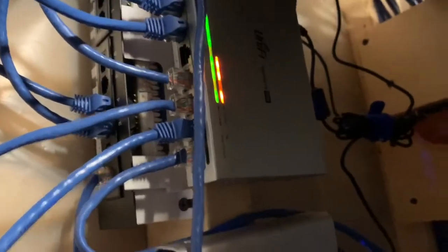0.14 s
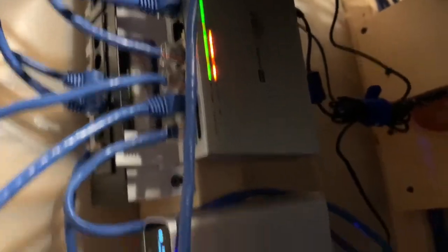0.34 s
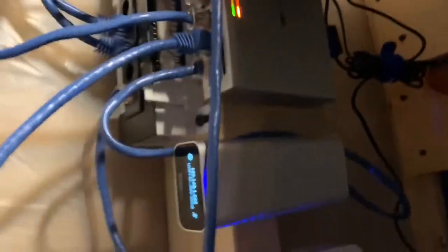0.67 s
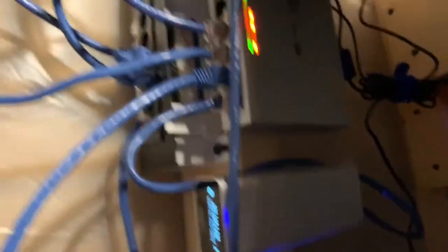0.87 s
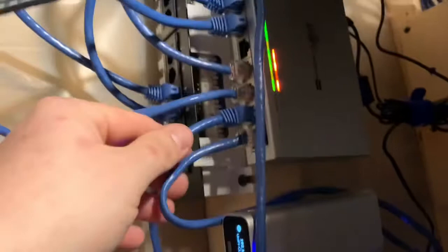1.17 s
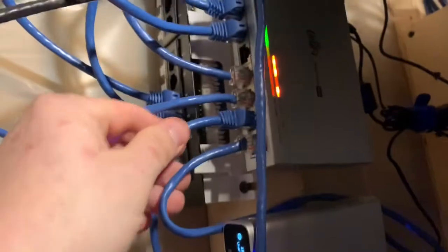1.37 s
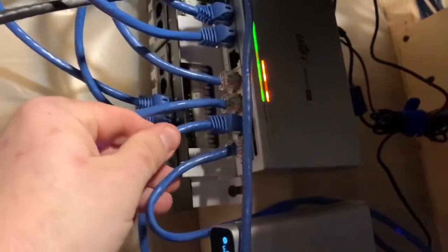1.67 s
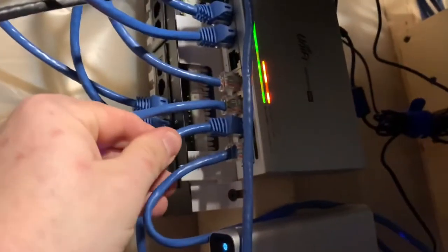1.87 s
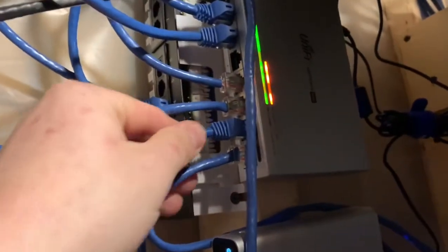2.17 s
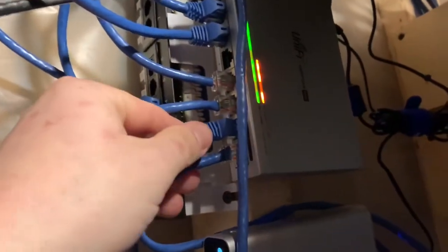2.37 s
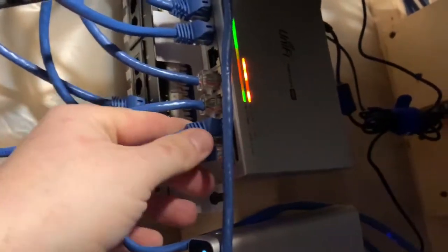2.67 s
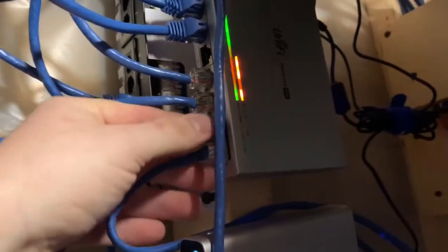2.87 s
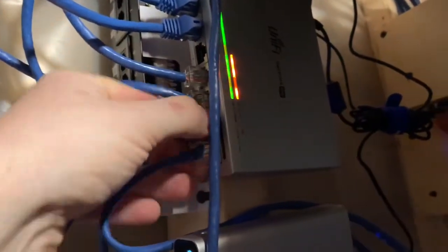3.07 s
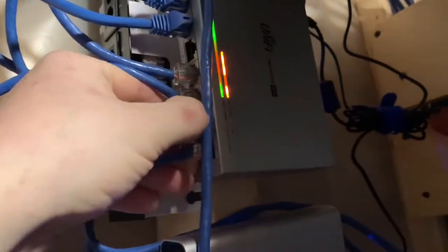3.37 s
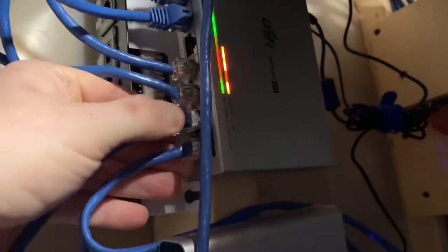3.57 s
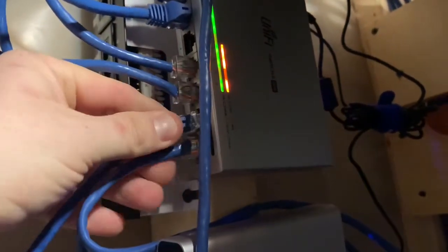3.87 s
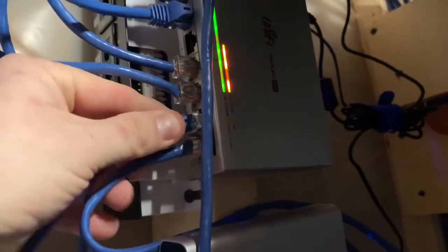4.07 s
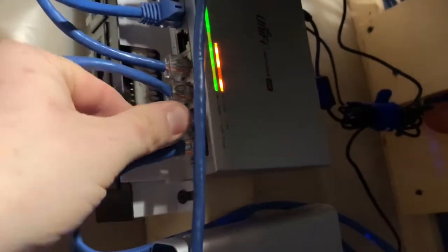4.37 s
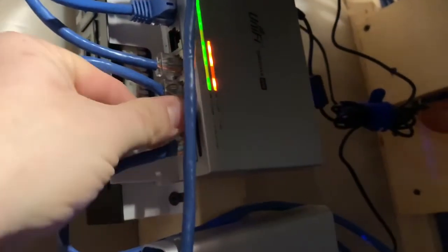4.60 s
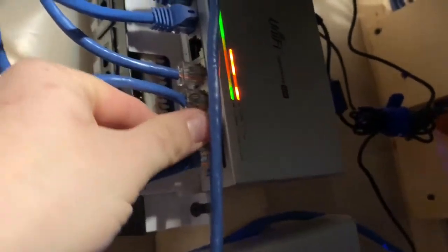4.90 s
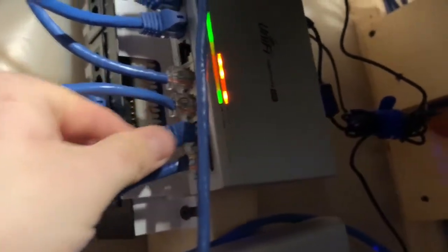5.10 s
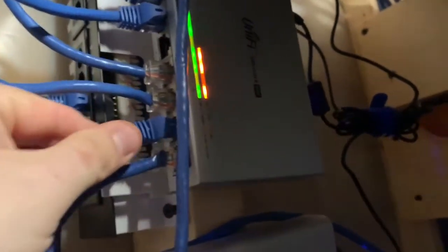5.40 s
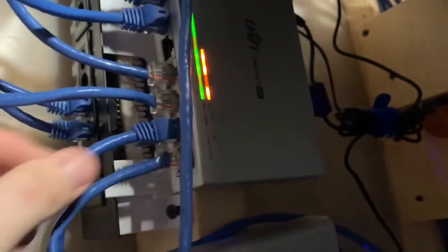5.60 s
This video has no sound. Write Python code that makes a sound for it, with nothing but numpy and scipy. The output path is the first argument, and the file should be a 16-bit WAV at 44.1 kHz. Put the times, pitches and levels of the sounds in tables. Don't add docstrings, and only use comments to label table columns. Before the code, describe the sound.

Quiet room with soft steady hiss and low, uneven rumble from a hand-held microphone, close to the plugs. At about 0.3 s there are faint plastic ticks; a light brush and dull bump follow around 0.8 s, then a scuff at 0.9 and a low thud at 1.1. At 1.3 s a plug is driven in with a loud, hollow, boxy knock and tiny rebound, followed at 1.5 by a heavy desk thud with cable rub and smaller bumps until 1.9. The middle is sparse: a grainy scrape with a thin squeak near 2.5, soft scuffs to 3.1, dull taps and finger rustle at 3.3-3.9. At 4.4 s a bump precedes a very sharp, bright latch snap at 4.47 with a low thump beneath. Faint ticks lead to a second hard hollow knock at 5.1, then small bumps, rubbing and a last rustle near 5.7. The room tail is short and faint.

```python
import sys
import numpy as np
from scipy import signal
from scipy.io import wavfile

SR = 44100
rng = np.random.default_rng(int(sys.argv[2]) if len(sys.argv) > 2 else 0)


def gain_from_db(level_db):
    decades = np.asarray(level_db, float) / 20
    return 10 ** decades


def master(y):
    cut = np.clip(np.atleast_2d(y).T, -1, 1)
    pcm = np.round(cut * 32767)
    wavfile.write(sys.argv[1], SR, pcm.astype(np.int16))


N = 253442
RING = int(.45 * SR)
BLOW_LAG_S = -.000165
HISS_TOP_HZ = 15400

# pitch in Hz, level in dB, t60 in seconds.
CASING = [(246, -8, 0.12), (357.4, 0, 0.29), (531, -8.5, 0.12), (600, 4.5, 0.06), (740, -7, 0.12),
          (955, -11, 0.16)]
# pitch in Hz, level in dB, t60 in seconds.
SHELL = [(950, -10.5, 0.11), (1130.5, 0, 0.054), (1313, -5.5, 0.13), (1590, -2.5, 0.038),
         (1800, -2.5, 0.036), (1961, 1, 0.073), (2320, 1, 0.041), (2810, 0, 0.051), (3250, -5.5, 0.019),
         (3730, -13, 0.017)]
# pitch in Hz, level in dB, t60 in seconds.
PLUG = [(3920, -2.5, 0.028), (4366, -1, 0.038), (5343, -10.5, 0.004), (6280, -7.5, 0.024),
        (7200, -11.5, 0.0029), (8463, -4.5, 0.045), (8940, -3, 0.017), (10290, -4.5, 0.022),
        (12900, -11, 0.0025), (14700, -9, 0.015), (14300, -11, 0.012)]


def bandpass(x, order, low_hz, high_hz):
    return signal.sosfilt(signal.butter(order, [low_hz, high_hz], "band", fs=SR, output="sos"), x)


def steep_low(x, order, stop_db, hz):
    return signal.sosfilt(signal.cheby2(order, stop_db, hz, fs=SR, output="sos"), x)


def in_time(rows):
    s, *columns = np.transpose(rows)
    return [np.interp(np.arange(N) / SR, s, c) for c in columns]


def at_hz(points, hz):
    return np.interp(np.log(hz), np.log(np.array(points)[:, 0]), np.array(points)[:, 1])


def rms_one(x):
    return x / np.sqrt(np.mean(x ** 2) + 1e-20)


def add(out, s, sound):
    i = round(s * SR)
    out[:, i:i + sound.shape[1]] += sound[:, :N - i]


def drift(rate_hz, spread_db):
    r = np.exp(-80 * np.pi * rate_hz / SR)
    slow = signal.lfilter([1], [1, -2 * r, r * r], rng.standard_normal(N // 40 + 2002))[2000:]
    gain = gain_from_db(spread_db * rms_one(slow - slow.mean()))
    return np.interp(np.arange(N) / 40, np.arange(len(slow)), gain)


def banded(source, spectrum, patchy_db):
    # frequency in Hz, share heard by both ports (0-1).
    likeness = [(60, 0.93), (180, 0.8), (550, 0.55), (1650, 0.12), (4000, 0.28), (7000, 0.45),
                (10000, 0.36), (15000, 1)]
    left_lag_s = -.000214
    shared, own = source[0], np.array([source[1], source[1][::-1]])
    shared = np.array([np.roll(shared, round(left_lag_s * SR)), shared])
    ends = np.log2(np.array(spectrum)[[0, -1], 0])
    edges = 2 ** np.arange(ends[0], ends[1] + .25, .5)
    out = 0
    for low, high in zip(edges, np.minimum(edges[1:], .45 * SR)):
        hz = np.sqrt(low * high)
        level_db = at_hz(spectrum, hz)
        if level_db < -55:
            continue
        alike = np.clip(at_hz(likeness, hz), 0, 1)
        both = np.sqrt(alike) * shared + np.sqrt(1 - alike) * own
        out = out + gain_from_db(level_db) * drift(12, patchy_db) * bandpass(both, 2, low, high)
    return rms_one(out)


def body(modes, lag_s=BLOW_LAG_S):
    hz, level_db, t60 = np.transpose(modes)[:, :, None]
    t = np.arange(min(RING, round(1.3 * t60.max() * SR))) / SR
    swell = 1 - np.exp(-3 * hz * t)
    ringing = swell * gain_from_db(level_db - 60 * t / t60) * np.exp(2j * np.pi * hz * t)
    return ringing, np.exp(-2j * np.pi * hz[:, 0] * [[lag_s], [0]])


def crowd(modes, spread, count):
    rows = np.repeat(np.array(modes, float), count, axis=0)
    rows[:, 0] *= 1 + spread * rng.uniform(-1, 1, len(rows))
    rows[:, 2] *= 0.93
    return rows


def ports(rings, hz):
    # frequency in Hz, left lead in radians.
    lead = [(130, -0.15), (330, 0), (400, -1), (470, 3), (530, 0), (588, -1.42), (777, 1), (982, 0.65),
            (1180, -1), (1360, -2)]
    # frequency in Hz, left minus right in dB.
    pan = [(130, -4), (165, -2.5), (270, 4.5), (330, -0.5), (470, 6.5), (588, 4.5), (777, 1.5), (982, -3),
           (1600, -3)]
    halves = np.array([[.5], [-.5]])
    return rings[0], gain_from_db(at_hz(pan, hz) * halves) * np.exp(1j * at_hz(lead, hz) * halves)


def strike(rings, contact, peak_db, scatter_db, apart):
    ringing, lag = rings
    draw = rng.standard_normal((3, len(ringing)))
    phase = apart * draw[1] * [[.7], [-.7]] + .3 * draw[2]
    weights = gain_from_db(scatter_db * draw[0]) * lag * np.exp(1j * phase)
    sound = signal.fftconvolve((weights @ ringing).imag, contact[None])[:, :RING]
    return gain_from_db(peak_db) * sound / np.abs(sound).max()


def chatter(length_ms, grain_db):
    t = np.arange(RING // 4) * 1000 / SR / max(length_ms, .1)
    slips = rng.standard_normal(len(t)) * gain_from_db(grain_db * rng.standard_normal(len(t)))
    return slips * (1 - np.exp(-t / .12)) * (np.exp(-t / .45) + .3 * np.exp(-t / 1.6))


def soft(length_ms):
    return np.hanning(max(round(length_ms * SR / 1000), 3))


def burst(length_ms, peak_db, low_hz, high_hz):
    crack = bandpass(np.pad(chatter(length_ms, 2.0), (20, 200)), 3, low_hz, high_hz)
    both = np.array([np.roll(crack, round(BLOW_LAG_S * SR)), crack])
    return gain_from_db(peak_db) * both / np.abs(crack).max()


def grains(per_s):
    born = rng.random((2, N)) < per_s / SR
    sizes = gain_from_db(2.5 * np.minimum(rng.exponential(1, (2, N)), 4)) * rng.standard_normal((2, N))
    return rms_one(born * sizes) + .8 * rng.standard_normal((2, N))


def strokes(rows):
    edge_s = 0.25
    t = np.arange(N) / SR
    gain = np.zeros(N)
    for s, length_s, db in rows:
        gain += gain_from_db(db) * np.clip(np.minimum(t - s, s + length_s - t) / edge_s + .5, 0, 1) ** 2
    return gain


def steady_hiss():
    # frequency in Hz, density in dB per Hz.
    spectrum = [(59, -30), (100, -11.5), (167, -24.5), (359, -15), (772, -21.5), (1290, -23.5), (2500, -28),
                (5000, -32), (7200, -32.5), (9300, -30.5), (11500, -33.5), (14300, -36), (16200, -55)]
    hiss = gain_from_db(-76.5) * banded(rng.standard_normal((2, N)), spectrum, patchy_db=2.04)
    return steep_low(hiss, 10, 30, HISS_TOP_HZ)


def grip_rumble():
    # time in seconds, level in dB.
    grip = [(0.0, -59), (0.57, -75), (0.78, -60), (0.93, -54.5), (1.3, -64.5), (1.52, -53), (2.25, -68),
            (2.42, -59), (3.07, -57), (3.4, -54.5), (4.21, -61.5), (4.54, -49), (4.8, -55.5), (5.15, -55),
            (5.28, -60), (5.42, -55.5), (5.75, -72)]
    # frequency in Hz, density in dB per Hz.
    spectrum = [(12, -56.5), (20, -14.5), (42, -6.5), (59, 5.5), (72, 0.5), (92, -13), (216, -23),
                (250, -20.5), (320, -61), (550, -120)]
    grip_db, = in_time(grip)
    return gain_from_db(grip_db + 4.5) * banded(rng.standard_normal((2, N)), spectrum, patchy_db=4.5)


def cable_rub():
    # time in seconds, effort in dB.
    effort = [(0.0, -72.5), (0.77, -79.5), (0.94, -66), (1.14, -57.5), (1.33, -66), (1.49, -51),
              (1.77, -68.5), (2.02, -80.5), (2.22, -73.5), (2.83, -62.5), (3.38, -67), (3.49, -71.5),
              (4.34, -73), (4.48, -75), (5.01, -65), (5.28, -61), (5.54, -63.5), (5.75, -71.5)]
    # frequency in Hz, density in dB per Hz.
    spectrum = [(88, -29), (150, -3.5), (221, -3), (255, -7), (438, -10.5), (646, -17.5), (1780, -31),
                (2500, -46.5), (3250, -66), (5500, -120)]
    mean_effort_db, rub_db, follows = -65.5, -67.5, 1.4
    effort_db, = in_time(effort)
    gain = gain_from_db(rub_db + follows * (effort_db - mean_effort_db))
    return gain * banded(grains(880), spectrum, patchy_db=4.5)


def rustle():
    # frequency in Hz, density in dB per Hz.
    spectrum = [(900, -31), (1500, -3.5), (2000, -3.5), (3500, -6.5), (6000, -10.5), (10000, -14.5),
                (14000, -21), (16000, -27)]
    # start in seconds, length in seconds, level in dB.
    fingers = [
        (0.55, 0.13, -94),
        (0.855, 0.33, -72),
        (2.089, 0.29, -88),
        (2.65, 0.42, -71.5),
        (3.39, 0.079, -63.5),
        (3.838, 0.53, -79),
        (4.407, 0.22, -65.5),
        (5.18, 0.21, -81.5),
        (5.675, 0.24, -70.5),
    ]
    # start in seconds, length in seconds, level in dB.
    sleeve = [
        (0.45, 0.75, -73),
        (2.8, 0.12, -72.5),
        (5.68, 0.13, -86),
    ]
    # start in seconds, length in seconds, level in dB.
    dull_strokes = [
        (1.24, 0.24, -71.5),
        (1.493, 0.095, -55.5),
    ]
    noise = banded(grains(4000), spectrum, patchy_db=1.5)
    bright = bandpass(noise, 1, 4500, 12000)
    dull = signal.sosfilt(signal.butter(3, 4900, fs=SR, output="sos"), noise)
    mix = strokes(fingers) * noise + strokes(sleeve) * bright + strokes(dull_strokes) * dull
    return steep_low(mix, 10, 30, HISS_TOP_HZ)


def drags():
    # start in seconds, length in seconds, level in dB, pitch in Hz, width in Hz.
    drag_rows = [(5.6, .17, -78.5, 540, 160), (5.73, .3, -70, 330, 220), (1.4, 0.055, -77, 1300, 40),
                 (1.75, 0.063, -60, 613, 83), (3.85, 0.497, -83, 1240, 120), (2.121, .084, -78, 1555, 70),
                 (2.224, .062, -80, 1625, 110), (.022, .121, -81, 1612, 50), (.031, .078, -82, 1838, 50),
                 (1.635, .075, -75, 1800, 40), (4.28, 0.048, -68, 690, 250), (3.86, .05, -65, 430, 93),
                 (2.84, 0.22, -81, 1860, 300), (5.39, 0.18, -69, 556, 250), (.92, .045, -66, 620, 90),
                 (.92, .045, -70, 1130, 80), (5.17, .07, -48, 110, 70), (2.88, .12, -60, 200, 110)]
    edge_s = 0.032
    out = np.zeros((2, N))
    t = np.arange(round(.7 * SR)) / SR - .1
    skip = round(.08 * SR)
    for s, length_s, db, hz, width_hz in drag_rows:
        white = rng.standard_normal((3, len(t)))
        noise = bandpass(white[0] + .6 * white[1:], 2, hz - width_hz / 2, hz + width_hz / 2)
        shape = np.clip(np.minimum(t, length_s - t) / edge_s + .5, 0, 1) ** 2
        note = gain_from_db(db) * shape * rms_one(noise)
        add(out, max(s - .02, 0), note[:, skip:])
    return out


def panels():
    # time in seconds, peak in dB, pitch in Hz, t60 in seconds.
    panel_rows = [(0.341, -53, 990, 0.09), (0.335, -51, 2200, .03), (0.345, -45, 1480, 0.081),
                  (0.774, -57.5, 361, 0.15), (1.463, -43, 1640, 0.04), (1.532, -29, 611, 0.054),
                  (2.243, -74.5, 680, 0.07), (2.596, -54.5, 812, 0.04), (2.717, -55, 1060, 0.072),
                  (2.745, -55, 435, .08), (2.874, -63, 1040, .03), (2.877, -57.5, 1800, 0.035),
                  (2.951, -56, 1860, .04), (3.088, -51, 1040, 0.048), (3.16, -63, 1910, 0.045),
                  (3.332, -52, 550, 0.052), (3.333, -57.5, 1057, 0.091), (3.384, -48.5, 1894, 0.08),
                  (3.436, -43, 1920, 0.045), (4.478, -34.5, 650, 0.041), (4.97, -71, 698, 0.074),
                  (5.109, -48, 3700, 0.05), (1.295, -38, 450, .05), (2.483, -56, 600, .03),
                  (2.5075, -50, 690, .03), (1.197, -60, 850, .04), (5.112, -49, 2870, 0.032),
                  (5.385, -57, 636, 0.097), (1.31, -31, 3330, .04), (1.739, -41, 615, 0.053),
                  (1.046, -50, 3040, 0.022), (1.047, -49.5, 5470, 0.028), (5.551, -59.5, 1280, 0.048),
                  (5.551, -56, 562, .05), (3.439, -50, 3000, 0.049), (3.678, -56.5, 2100, 0.041),
                  (1.909, -66.5, 1894, 0.042), (1.289, -37, 1800, 0.035), (4.413, -44, 600, .04)]
    out = np.zeros((2, N))
    for s, peak_db, hz, t60 in panel_rows:
        cluster = [(.97 * hz, -4.0, t60), (hz, 0, t60), (1.05 * hz, -6.0, .8 * t60)]
        add(out, s, strike(body(cluster), chatter(3.3, 2.8), peak_db, 1.0, 0.64))
    return out


def taps(shell):
    # time in seconds, 1-4 kHz crack peak in dB, tick in dB, contact length in ms.
    tap_rows = [(0.3366, -54.5, -91, 9.1), (0.345, -52, -99, 14.2), (1.045, -65, -64, 31),
                (1.2207, -53.5, -53.5, 27), (1.2884, -37.5, -54.5, 5.4), (1.3075, -26, -43.5, 12.2),
                (1.462, -42, -79, 3.6), (1.53, -46, -51.5, 9.2), (1.7377, -57.5, -55, 4.2),
                (1.8052, -65.5, -71, 1.2), (1.9069, -66.5, -73.5, 6.9), (2.95, -63.5, -71.5, 19),
                (3.0868, -61, -98, 21.5), (3.3796, -60.5, -68, 27), (3.4154, -59.5, -65, 59),
                (3.435, -55.5, -59.5, 13), (3.5248, -63.5, -96, 4.1), (3.673, -54, -57.5, 13.4),
                (3.7678, -61, -70, 22), (3.784, -52, -53.5, 20.6), (4.412, -54, -67.5, 15),
                (4.734, -63.5, -73, 6.3), (4.816, -77, -75, 7.7), (4.8744, -71.5, -80.5, 6.5),
                (5.1052, -32.5, -51, 13.4), (5.3193, -65, -73, 4.6), (5.5492, -57, -77, 3.9),
                (0.766, -65, -66, 53)]
    out = np.zeros((2, N))
    plug = crowd(PLUG, 0.083, count=5)
    octaves = np.log2(plug[:, 0] / 4000)
    ringing, lag = body(plug)
    for s, crack_db, tick_db, length_ms in tap_rows:
        hardness_db = tick_db - crack_db
        tilt_db = np.clip(0.12 * hardness_db + 0.5, -12, 3)
        tilted = ringing * gain_from_db(tilt_db * octaves)[:, None], lag
        top_hz = np.clip(4792.5 + 49.0 * hardness_db, 1500, 6000)
        add(out, s, strike(shell, chatter(length_ms, 0.62), crack_db + 4.0, 3.1, 1.5))
        add(out, s, strike(tilted, chatter(0.42 * length_ms, 12.0), tick_db + 12.0, 1.5, 2.0))
        add(out, s, burst(length_ms, crack_db, 890, top_hz))
        add(out, s, burst(.5 * length_ms, tick_db + 5.0, 2700, 15500))
    return out


def aftermath():
    # time in seconds, rms in dB, low edge in Hz, high edge in Hz, t60 in seconds.
    after_rows = [(.565, -63, 450, 800, 0.056), (.63, -72, 2000, 4500, 0.14), (0.768, -60, 600, 12000, .04),
                  (.775, -54, 199, 420, 0.42), (1.2, -61, 7500, 14900, 0.038), (1.33, -44, 302, 750, 0.36),
                  (1.507, -64, 3500, 13960, .03), (1.53, -47.5, 700, 4800, .12),
                  (2.24, -66.5, 600, 1800, .08), (2.485, -60, 525, 820, 0.13), (2.76, -70, 600, 2670, 0.35),
                  (5.098, -49, 180, 700, .05), (5.13, -45, 220, 620, 0.44), (5.3, -61, 200, 600, 0.41),
                  (4.93, -67, 600, 950, 0.26), (5.72, -68, 500, 2200, .1), (4.474, -44, 800, 3500, .12),
                  (5.551, -62, 1000, 4500, .04), (5.321, -64, 600, 2400, .05),
                  (3.437, -58, 1500, 5000, .04), (.342, -60, 1400, 2500, .07), (4.55, -62, 600, 1100, .08),
                  (1.738, -56, 1000, 1600, .06), (3.674, -64, 6000, 15000, .04),
                  (2.595, -66, 550, 2300, .1), (3.09, -64, 500, 2200, .12)]
    rise_s = 0.0052
    out, t = np.zeros((2, N)), np.arange(RING) / SR
    for s, db, low_hz, high_hz, t60 in after_rows:
        white = rng.standard_normal((3, RING))
        noise = rms_one(bandpass(white[0] + .5 * white[1:], 2, low_hz, high_hz))
        rise = np.clip(t * high_hz / 4000 / rise_s, 0, 1)
        add(out, s, gain_from_db(db - 60 * t / t60) * rise * noise)
    return out


def bumps(shell, casing):
    # time in seconds, desk thud in dB, casing in dB.
    bump_rows = [(0.7656, -41.5, -61.5), (0.9186, -57, -62), (1.0902, -35, -48), (1.2882, -45, -53.5),
                 (1.3091, -27, -45), (1.4265, -48, -55.5), (1.507, -36.5, -58), (1.5301, -21.5, -37.5),
                 (1.7372, -40.5, -48.5), (1.8043, -47, -75), (1.9075, -48, -68), (2.873, -49, -73.5),
                 (3.3303, -38, -60), (3.3784, -45.5, -64.5), (3.4158, -51.5, -66.5), (3.7853, -45.5, -60.5),
                 (3.8688, -43.5, -66.5), (4.413, -29, -50.5), (4.734, -49, -66), (5.1064, -37.5, -63),
                 (5.32, -49.5, -62), (5.3843, -46, -54), (5.7142, -64.5, -74), (1.2223, -80, -66.5),
                 (1.4624, -69, -62), (3.0887, -59, -64), (3.437, -64.5, -59), (5.5521, -69, -63.5)]
    # pitch in Hz, level in dB, t60 in seconds.
    desk_modes = [(80.1, -10, 0.27), (118, 0.5, .12), (152.5, 4.5, 0.12), (215.8, -5, 0.27)]
    out = np.zeros((2, N))
    desk = ports(body(desk_modes), np.array(desk_modes)[:, 0])
    for s, thud_db, casing_db in bump_rows:
        add(out, s, strike(shell, chatter(11, 3.6), casing_db + 1.5, 0.91, 0.83))
        add(out, s + 0.002, strike(casing, soft(0.9), casing_db + 8.0, 3.9, 0.72))
        add(out, s + 0.0074, strike(desk, soft(4.18), thud_db, 2.6, 0.032))
    return out


def swings():
    # time in seconds, peak in dB, pitch in Hz, t60 in seconds.
    swing_rows = [(0.786, -37, 106.2, 0.26), (1.35, -54.5, 141, 0.17), (1.525, -25.5, 143.8, 0.27),
                  (3.43, -39.5, 69.5, 0.085), (3.809, -40.5, 77.6, 0.29), (4.498, -28.5, 125, 0.1),
                  (4.509, -22, 65.1, 0.052), (5.123, -30, 125, 0.25), (1.2249, -42, 842, 0.04),
                  (3.333, -36.5, 231.4, 0.21), (4.415, -37, 125.4, 0.058), (2.32, -61, 330, 0.56),
                  (2.441, -59, 353, 0.3)]
    out = np.zeros((2, N))
    for s, peak_db, hz, t60 in swing_rows:
        pair = [(hz, 0, t60), (1.34 * hz, -6.0, 0.56 * t60)]
        add(out, s, strike(body(pair), soft(500 / hz), peak_db, 1.4, 0.12))
    return out


def scuffs(shell, casing):
    # start in seconds, length in ms, peak in dB, casing share in dB, tilt in dB per octave.
    scuff_rows = [
        (0.905, 55, -50, -1.5, -2),
        (2.464, 71, -55.5, 6, -1),
        (2.589, 28, -62, 6.5, -3),
        (2.706, 76, -53.5, 1.5, -7.5),
        (3.0, 110, -62.5, -13, -2.5),
        (2.78, 44, -65, -3, -8),
        (2.86, 40, -56.5, -3.5, -1),
        (4.272, 41, -64, 2, -1),
    ]
    out = np.zeros((2, N))
    octaves = np.log2(np.repeat(np.array(SHELL)[:, 0], 5) / 1500)[:, None]
    for s, length_ms, peak_db, casing_db, tilt_db in scuff_rows:
        push = soft(length_ms)
        slips = push * rng.standard_normal(len(push)) * gain_from_db(2.0 * rng.standard_normal(len(push)))
        tilted = shell[0] * gain_from_db(tilt_db * octaves), shell[1]
        add(out, s, strike(tilted, slips, peak_db, 1.6, 0.81))
        add(out, s, strike(casing, np.diff(slips), peak_db + casing_db, 3.2, 0.97))
    return out


def contacts():
    casing = crowd(CASING, 0.09, count=2)
    casing = ports(body(casing), casing[:, 0])
    shell = body(crowd(SHELL, .08, count=5))
    return taps(shell) + bumps(shell, casing) + scuffs(shell, casing)


def knocks():
    # time in seconds, peak in dB, contact in ms, rebound in dB.
    knock_rows = [
        (1.3104, -9.5, .9, -22),
        (5.1086, -12.5, 1.1, -22),
    ]
    # pitch in Hz, level in dB, t60 in seconds.
    box_modes = [(132.2, -10, 0.27), (168, -7.5, 0.16), (272, -10, 0.14), (330, 6.5, 0.062),
                 (1335, -12, 0.06), (480, 2.5, 0.019), (590, 11.5, 0.031), (1570, -8.5, 0.05),
                 (782, -1.5, 0.1), (985, -5.5, 0.12), (1172, -3, 0.075)]
    rebound_s = .0161
    out = np.zeros((2, N))
    box = ports(body(box_modes), np.array(box_modes)[:, 0])
    for s, peak_db, contact_ms, rebound_db in knock_rows:
        blow = -strike(box, soft(contact_ms), peak_db, 0.93, 0.23)
        add(out, s + 0.00065, blow)
        add(out, s - .0006, -gain_from_db(-10.0) * blow)
        push = soft(24.0) ** 2
        scrape = push * rng.standard_normal(len(push))
        plastic = body(crowd(SHELL + PLUG[:4], 0.13, count=4))
        add(out, s - .016, strike(plastic, scrape, peak_db - 23.5, 1.7, 0.74))
        add(out, s + 0.0028, burst(20.0, peak_db - 35.0, 2500, 10000))
        add(out, s + 0.0028, burst(15.0, peak_db - 16.0, 700, 1700))
        softened = signal.lfilter(soft(2.08) / soft(1.9).sum(), 1, blow)
        add(out, s + rebound_s, -gain_from_db(rebound_db) * softened)
        add(out, s + rebound_s, gain_from_db(peak_db - 5.5) * soft(3.1) * gain_from_db([[-2.0], [1.0]]))
    return out


def slide():
    # time in seconds, hiss in dB, squeak in dB.
    slide_rows = [
        (2.44, -89, -100),
        (2.47, -65, -69),
        (2.52, -62, -66),
        (2.56, -85, -100),
        (2.6, -100, -80),
        (2.68, -100, -68),
        (2.72, -100, -100),
    ]
    squeak_hz, width_hz = 9570, 510
    hiss_db, squeak_db = in_time(slide_rows)
    hiss = bandpass(grains(5000), 1, 350, 5000)
    squeak = bandpass(rng.standard_normal(N), 2, squeak_hz - width_hz / 2, squeak_hz + width_hz / 2)
    return gain_from_db(hiss_db) * rms_one(hiss) + gain_from_db(squeak_db) * rms_one(squeak)


def latch():
    # time in seconds, snap peak in dB, crack in dB, casing in dB.
    latch_rows = [
        (4.471, -10.5, -35.5, -39),
    ]
    # pitch in Hz, level in dB, t60 in seconds.
    tab_modes = [(5200, -15, 0.015), (6550, -3.5, 0.0046), (8560, -16, 0.032), (9400, -3, 0.006),
                 (9900, -12, 0.0094), (13300, 4.5, 0.0049), (13330, -2, 0.015), (13800, -4.5, 0.012),
                 (14400, -5, .008)]
    tab_lag_s = -.000136
    out, rattle = np.zeros((2, 2, N))
    highpass = signal.butter(3, 3500, "high", fs=SR, output="sos")
    for s, snap_db, crack_db, casing_db in latch_rows:
        push = soft(18.0)
        slip = push * rng.standard_normal(len(push))
        slipping = body(crowd(PLUG[2:6], .1, count=4))
        add(out, s - .016, strike(slipping, slip, snap_db - 40.0, 2.0, 1.5))

        snap = strike(body(tab_modes, tab_lag_s), soft(.09), snap_db + 5.0, .3, .15)
        add(out, s + .0023, signal.sosfilt(highpass, snap))
        tab = body(crowd(tab_modes, 0.17, count=4))
        add(out, s + .002, strike(tab, chatter(4.4, 1.4), snap_db - 16.0, 1.5, 0.94))

        add(rattle, s + 0.0032, burst(9.3, snap_db - 12.5, 1500, 15500))
        plug = body(crowd(PLUG, 0.13, count=6))
        add(rattle, s + .002, strike(plug, chatter(22.1, 1.7), snap_db - 25.0, 0.73, 0.95))

        shell = body(crowd(SHELL, 0.059, count=4))
        add(out, s + .003, strike(shell, chatter(13.0, 4.5), crack_db + 6.0, 1.5, 0.55))
        casing = body([(hz, db + 5.0 * np.log2(hz / 600), 0.32 * t60) for hz, db, t60 in CASING])
        add(out, s + 0.0074, strike(casing, chatter(12.17, 22.0), casing_db + 5.5, 1.6, 0.94))
    return out + hollow(rattle)


def hollow(x):
    mid, side = (x[0] + x[1]) / 2, (x[0] - x[1]) / 2
    mid = signal.sosfilt(signal.butter(4, (11050, 12350), "bandstop", fs=SR, output="sos"), mid)
    side = signal.sosfilt(signal.butter(3, (8900, 9700), "bandstop", fs=SR, output="sos"), side)
    side = steep_low(side, 8, 18, 13300)
    return np.array([mid + side, mid - side])


def room(x):
    # frequency in Hz, t60 in seconds.
    decay = [(100, 0.19), (500, 0.36), (900, .17), (2000, 0.1), (8000, 0.21), (16000, 0.08)]
    gap_s = 0.00091
    t, tail = np.arange(RING) / SR, 0
    white = rng.standard_normal((2, RING)) * np.clip(t / gap_s, 0, 1) ** 2
    for hz in 88 * 2 ** np.arange(8):
        octave = bandpass(white, 2, hz / np.sqrt(2), hz * np.sqrt(2))
        tail = tail + octave * gain_from_db(-60 * t / at_hz(decay, hz))
    return gain_from_db(-37.0) * signal.fftconvolve(x, tail, axes=1)[:, :N]


def scene():
    snap = latch()
    blows = contacts() + knocks() + swings()
    handling = grip_rumble() + cable_rub() + rustle()
    quiet = handling + slide() + steady_hiss() + panels() + drags() + aftermath()
    return snap + hollow(blows + room(gain_from_db(-7.0) * snap + blows) + quiet)


def band_limit(x):
    return signal.sosfilt(signal.butter(12, 16440, fs=SR, output="sos"), x)


def record(dry):
    dry = signal.sosfilt(signal.butter(3, 40, "high", fs=SR, output="sos"), dry)
    dry = steep_low(dry, 12, 70, 17000)
    return band_limit(dry)


dry = scene()
out = record(dry)
master(out)
```